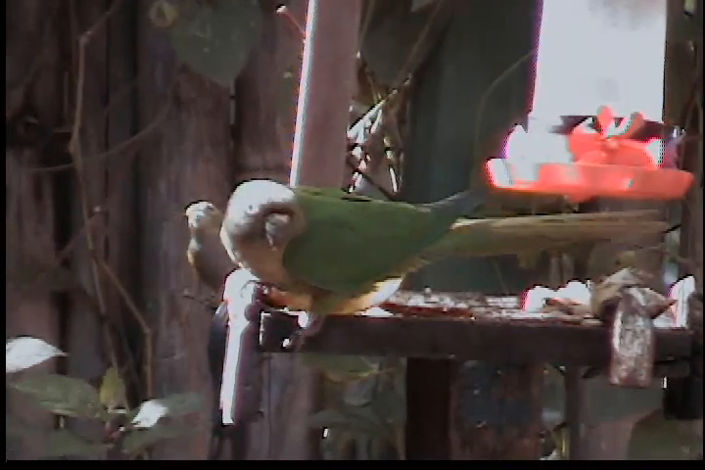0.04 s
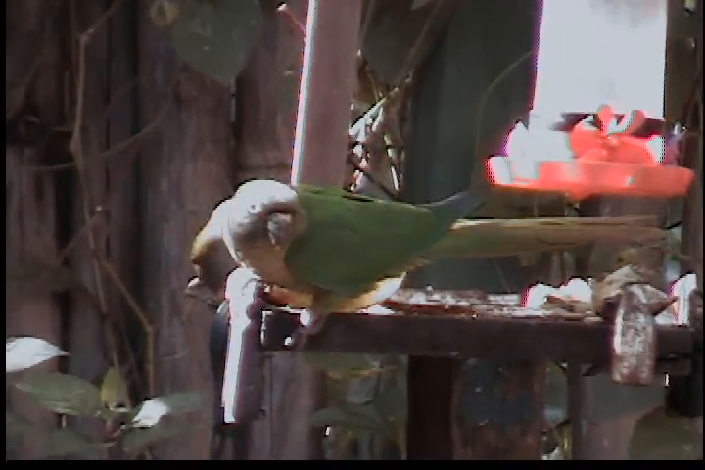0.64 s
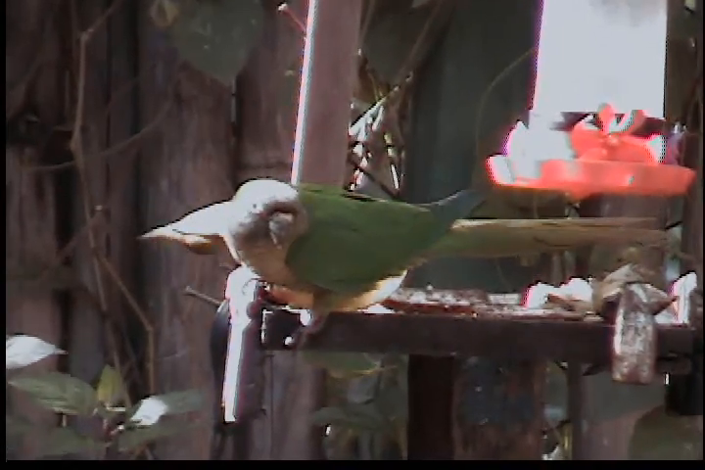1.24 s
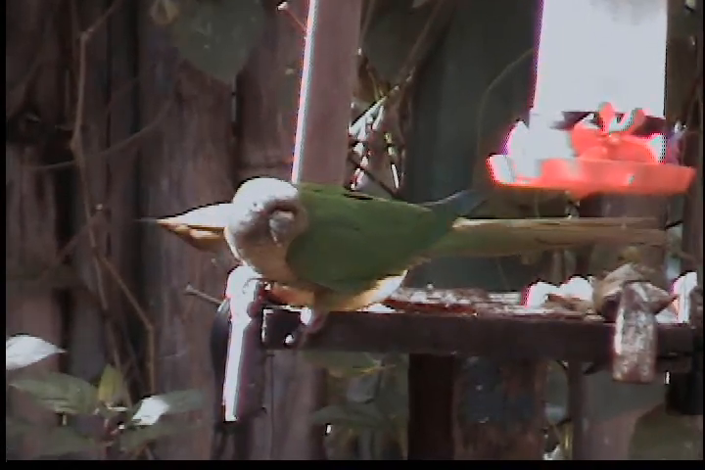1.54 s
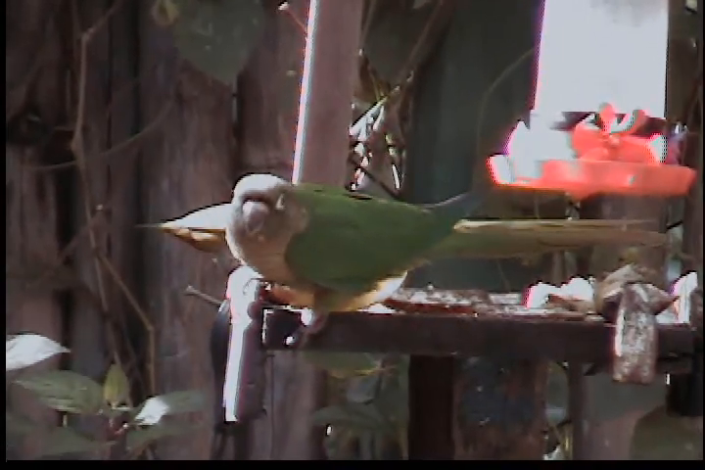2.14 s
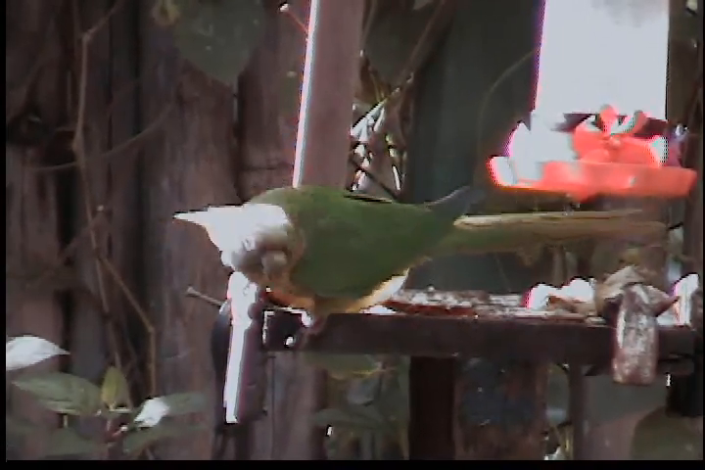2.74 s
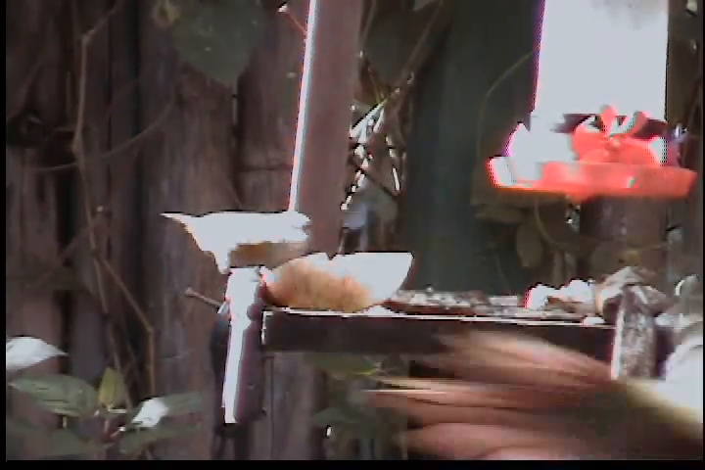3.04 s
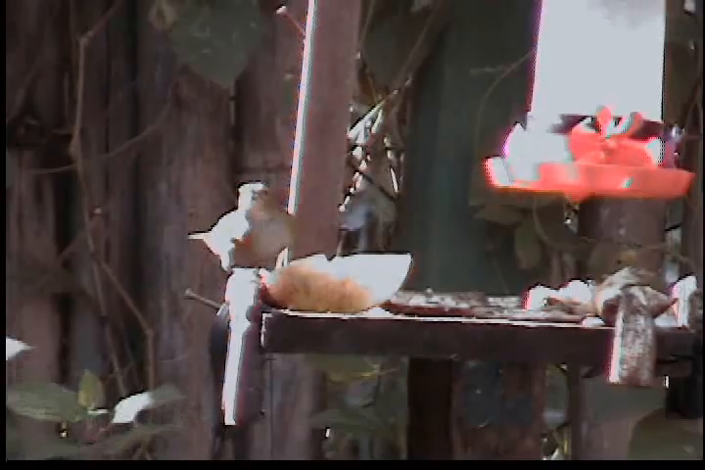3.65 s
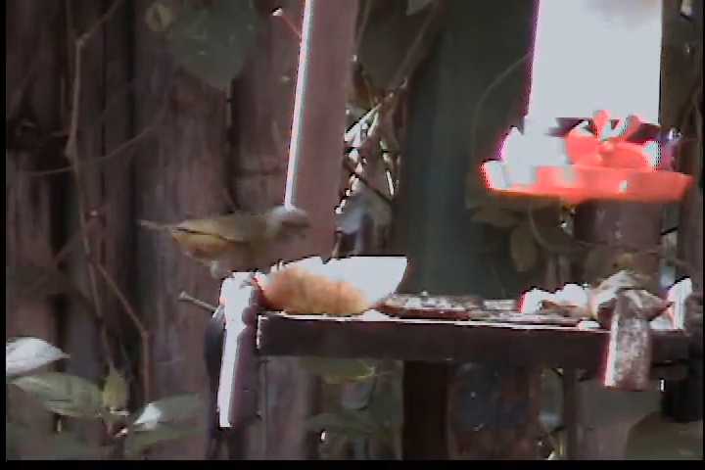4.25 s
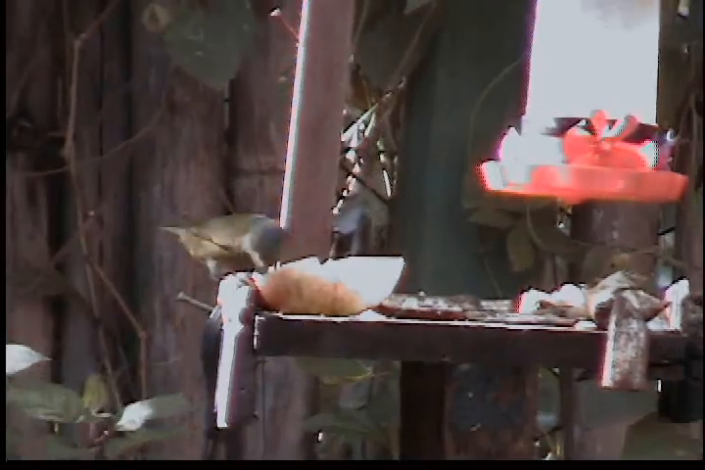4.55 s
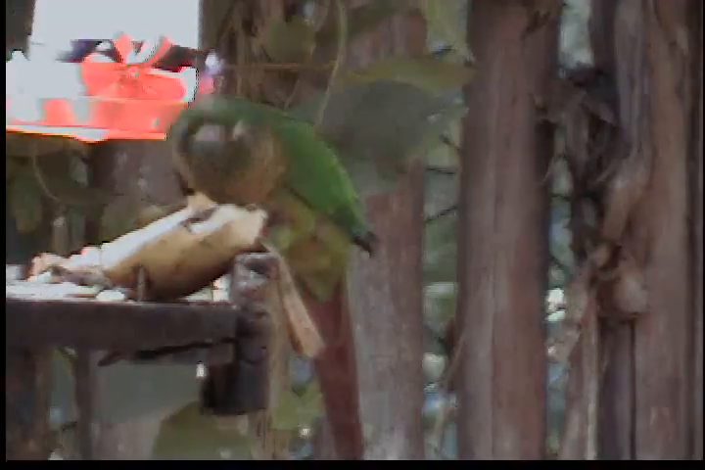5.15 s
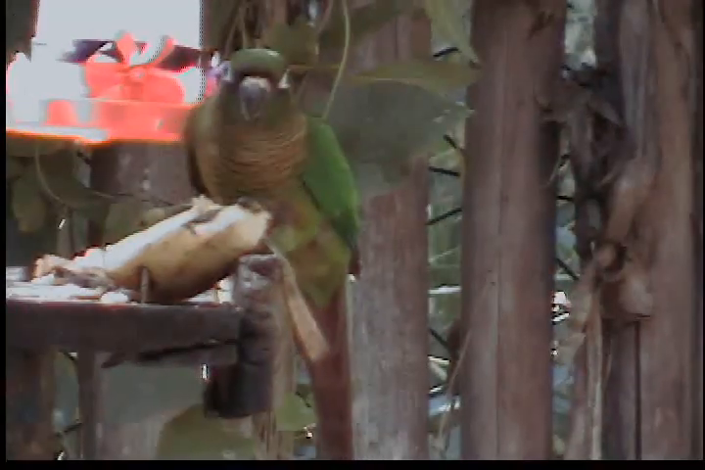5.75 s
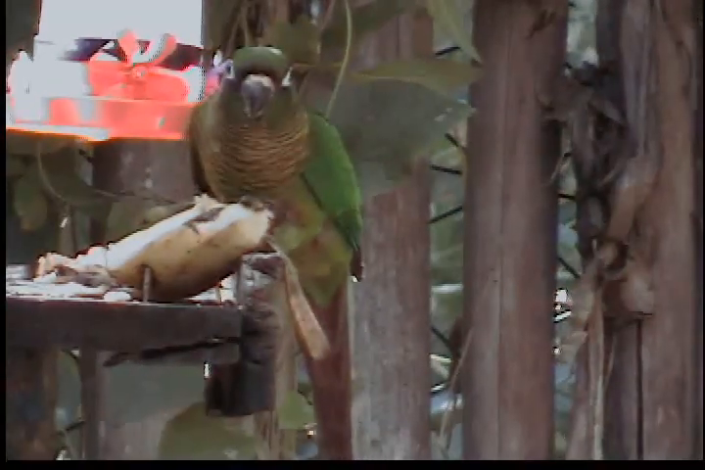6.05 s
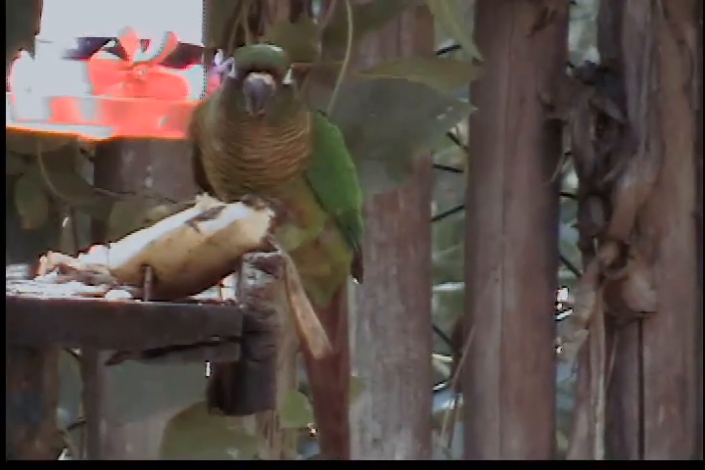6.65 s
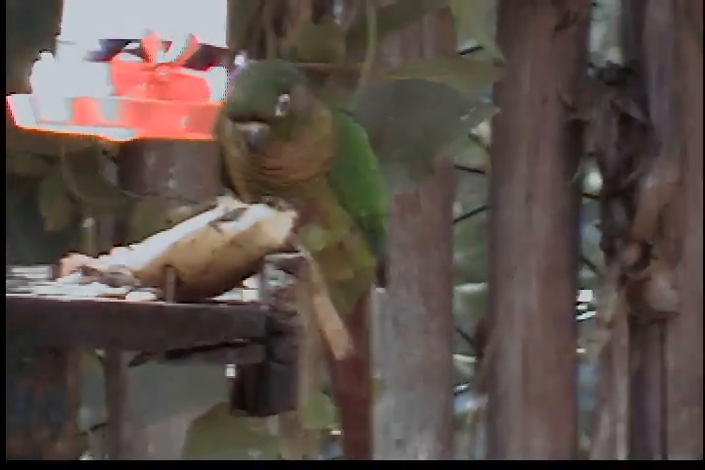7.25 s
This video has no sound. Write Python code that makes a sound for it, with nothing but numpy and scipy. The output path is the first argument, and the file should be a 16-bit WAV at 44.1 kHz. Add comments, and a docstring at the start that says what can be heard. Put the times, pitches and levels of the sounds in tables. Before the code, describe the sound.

Parakeets screech at a backyard feeder, about eight harsh calls that swell and slide down in pitch, some overlapping, with two short hoarse barks early on. The calls echo lightly off a fence and walls. Fainter whistled chirps answer from the trees, and near the end one close chip sounds sharp as a click. The microphone also picks up distant rumble, a low hum, a faint high whine and a few soft bumps.

```python
"""Parakeets screech and bark around a backyard feeder: a buzzing syrinx and puffs of rasp, shaped by
throat and beak. Each screech swells, slides down in pitch and echoes off fences and walls.
Short whistled chirps answer from the trees, and one close chip is sharp like a click.
Underneath sits a bed of distant rumble, low hum, a thin steady whine and a few soft bumps."""
import sys
import numpy as np
from scipy import signal
from scipy.fft import rfft, irfft
from scipy.io import wavfile
from scipy.ndimage import uniform_filter1d

SR = 44100
rng = np.random.default_rng(int(sys.argv[2]) if len(sys.argv) > 2 else 0)


def bounce(signal):
    """Save signal as a 16-bit WAV file at the path given by the first command-line argument."""
    frames = np.transpose(np.atleast_2d(signal))
    limited = np.clip(frames, -1, 1)
    pcm = np.round(limited * 32767).astype(np.int16)
    wavfile.write(sys.argv[1], SR, pcm)


N = 321489
TIME = np.arange(N) / SR

# EQ curve of the distant rumble and hiss: f/Hz, relative level/dB
RUMBLE_EQ = [(18,-20),(30,-3.5),(42,-13.5),(60,-11),(110,-9.5),(200,-15.5),(400,-19),(1000,-22),(2400,-28),(3000,-31.5),(4600,-38.5),(8500,-41)]
# level ride of the hum: t/s, level/dB
HUM_RIDE = [(0,-49),(2.8,-54.5),(3.3,-64),(5.3,-63.5),(5.6,-56),(7.29,-52.5)]
# tones of the whine: f/Hz, level/dB
WHINE_TONES = [(6050,-72),(7866,-76.5),(8000,-66.5)]
# screeches: start t/s, rise/s, fall/s, start f/Hz, crest f/Hz, rest f/Hz, glide/s, relative level/dB,
# opening against that level/dB, time to the burst/s, hold (exponent of the fade curve),
# treble/dB, dulling/(dB/s), rasp/dB, first beak f/Hz, last beak f/Hz
SCREECH_CUES = [ (.43, 0.083, 0.35, 692, 713.3, 561, 0.059,  -40, -11, 0.094, 10,  -0.5, 15, -9, 2770, 2460),
                (.77, 0.094, 0.2, 491, 494.5, 424, 0.13,  -32.5, -5, 0.057, 0.64,  -4, 141, -12.5, 2430, 2150),
                (1.355, 0.13, 0.48, 490.3, 748.3, 499, 0.081,  -37.5, -7.5, 0.17, 2.3,  4.5, 54, -7, 3700, 3150),
                (2.16, .13, 0.38, 480.5, 680.2, 470.6, .075,  -38.5, -6.5, .09, 2.1,  -3, 24, -7, 1280, 950),
                (2.93, .09, 0.16, 577.5, 554.7, 448.6, .11,  -39.5, -6, .10, 2.1,  0, 7, -3.5, 2360, 2100),
                (3.655, .149, 0.46, 485.7, 809.3, 492.2, .064,  -39.5, -5, 0.18, 3.3,  -3, 10, -7, 1510, 2150),
                (4.66, .14, 0.33, 551.5, 681.3, 456, 0.084,  -40, -4, 0.15, 2,  -2, 12, -7.5, 1950, 2060),
                (6.03, 0.14, .36, 659, 725.6, 459.5, 0.1,  -40.5, -6, 0.13, 2.8,  -4.5, 1.5, -6, 2850, 2030)]
# EQ curve of the rasp: f/Hz, relative level/dB
RASP_EQ = [(800,-4.5),(1700,5.5),(4300,2),(8000,-10.5)]
# resonances of throat and beak: f/Hz, relative level/dB
THROAT_EQ = [(400,-27.5),(600,-15),(750,0),(980,2),(1280,-1),(1750,1),(2100,-2.5),(2420,-3.5),(2800,-10),(3400,-8),(4300,-11.5),(5100,-13),(6500,-11),(8500,-9)]
# slaps off fence and wall: delay t/s, relative level/dB
WALL_SLAPS = [(.011,-8),(.036,-11)]
# hoarse barks: start t/s, length/s, pitch f/Hz, relative level/dB, treble/dB, beak f/Hz
BARK_CUES = [(1.091, 0.1, 373.2, -37, -8, 2200), (2.868, 0.073, 565, -40, -9, 1750)]
# chirps, one slur each: start t/s, length/s, first f/Hz, last f/Hz, dry level/dB, warble (share of pitch)
CHIRP_CUES = [(1.974,0.067,4140,4700,-56,0.013),(2.038,0.052,4550,3860,-50.5,0.034),(2.506,0.061,4620,3920,-48,0.02),
              (3.211,0.093,3630,4330,-54,0.062),(3.306,.085,4610,3025,-50,.035),(3.634,0.13,3970,3190,-47,0.031),
              (4.07,.12,4220,3683,-46.5,0.015),(4.183,0.078,3690,3126,-47.5,0.013),(4.469,0.12,3545,3390,-51,.12),
              (4.943,.06,4020,3450,-58,0.016),(5.029,.05,3750,3180,-54,0.017),(5.125,0.095,4200,2900,-53.5,0.095),(5.281,.085,3383,4195,-51,0.041),
              (5.773,0.1,4360,3214,-58,0.097),(5.984,0.083,3800,4380,-56.5,0.056),(6.591,0.082,4390,3080,-52,0.079),
              (6.809,.076,3740,3836,-46.5,0.094),(7.147,0.15,3700,3960,-55,0.12)]
# partials of a chirp: multiple of the pitch, relative level/dB
CHIRP_TIMBRE = [(.5,-18.5),(1,-2),(1.5,-17)]
# soft bumps: centre t/s, length/s, level/dB
BUMP_CUES = [(4.637,0.091,-48),(5.858,0.074,-44.5),(7.21,0.047,-40)]
# the close chip: start t/s, length/s, first f/Hz, middle f/Hz, last f/Hz, relative level/dB
CHIP_CUE = (6.772,.052,3330,3260,3480,-35)
# partials of the chip: multiple of the pitch, relative level/dB
CHIP_TIMBRE = [(1,-0.5),(1.6,-17),(2,-22),(2.2,-22.5),(.42,-18)]


def from_db(db):
    """Decibels to gain."""
    return 10 ** (np.asarray(db) / 20)


def rms_one(x):
    """Scale to unit power."""
    return x / np.sqrt(np.mean(x ** 2) + 1e-20)


def equalise(x, curve):
    """Shape a sound with an EQ curve on a log-frequency axis; rms 1."""
    hz = np.arange(len(x) // 2 + 1) * SR / len(x)
    curve_hz, curve_db = np.transpose(curve)
    gain_db = np.interp(np.log(np.maximum(hz, 1)), np.log(curve_hz), curve_db)
    return rms_one(irfft(rfft(x) * from_db(gain_db), len(x)))


def drift(size, rate_hz):
    """Random modulation up to about the given rate; rms 1."""
    lowpass = signal.butter(2, rate_hz, fs=SR, output="sos")
    return rms_one(signal.sosfilt(lowpass, rng.standard_normal(size + SR // 4))[-size:])


def span(start, length):
    """The times that a sound covers."""
    return TIME[(TIME >= start) & (TIME < start + length)]


def fade(t, edge_s):
    """Soft attack and release."""
    return np.sin(np.pi / 2 * np.clip(np.minimum(t - t[0], t[-1] - t) / edge_s, 0, 1))


def mix(sounds):
    """Lay (times, sound) pairs on one track."""
    track = np.zeros(N)
    for t, sound in sounds:
        track[np.searchsorted(TIME, t[0]):][:len(t)] += sound
    return track


def rumble(level_db=-48):
    """Distant noise, heavy in the lows with a faint hiss on top."""
    return from_db(level_db) * equalise(rng.standard_normal(N), RUMBLE_EQ)


def hum(hz=71.1):
    """A low, slightly wavering tone that ducks midway and comes back."""
    level_db = np.interp(TIME, *np.transpose(HUM_RIDE))
    phase = 2 * np.pi * hz * TIME + .5 * drift(N, 3.9)
    return np.sqrt(2) * from_db(level_db) * np.sin(phase)


def whine():
    """Three thin, steady high tones."""
    return sum(np.sqrt(2) * from_db(db) * np.sin(2 * np.pi * hz * TIME) for hz, db in WHINE_TONES)


def voice(t, pitch, level_db, treble_db, rasp_db, beak_hz, beak_db=7, beak_width_hz=220, split_hz=2800):
    """The syrinx buzzes unsteadily and rasp puffs once a cycle; the beak colours the buzz, the throat colours
    both."""
    rasp = from_db(rasp_db)
    jitter = .004 * drift(len(t), 40) + .02 * rasp * drift(len(t), 250)
    phase = 2 * np.pi * np.cumsum(pitch * (1 + jitter)) / SR
    top_hz = 4100 / rasp ** .16   # the hoarser the voice, the lower its clean overtones end
    buzz = 0
    for k in range(2, 16):   # overtones only, no fundamental
        resonance_db = beak_db / (1 + ((k * pitch - beak_hz) / beak_width_hz) ** 2)
        flicker_db = 5.5 * drift(len(t), 11.2)
        rolloff = 1 / (1 + (k * pitch / top_hz) ** 8)
        buzz += np.sin(k * phase) * from_db(resonance_db + flicker_db) * rolloff
    puffs = equalise(rng.standard_normal(len(t)) * (1 + np.cos(phase)), RASP_EQ)
    call = equalise(rms_one(buzz) + rasp * puffs, THROAT_EQ)
    # set the brightness: level the low and high bands, then mix them by the given treble
    low = signal.sosfiltfilt(signal.butter(6, split_hz, fs=SR, output="sos"), call)
    high = call - low
    low, high = [band / np.sqrt(uniform_filter1d(band ** 2, size=1800) + 1e-9) for band in (low, high)]
    return t, from_db(level_db - 2) * (low + from_db(treble_db) * high) * fade(t, .025)


def screech(start, rise, fall, start_hz, crest_hz, rest_hz, glide, level_db, opening_db, burst, hold,
            treble_db, dulling, rasp_db, first_beak_hz, last_beak_hz):
    """A held-back opening, a burst near the crest, then a slide that sags, dulls and fades."""
    burst_s, beak_move_s, entry_db, fade_db = .021, .19, -2, 10
    sag_hz_per_s = 300   # the pitch sinks as the breath runs out
    t = span(start, rise + fall)
    since_crest = t - start - rise
    to_climb, after = np.maximum(-since_crest / rise, 0), np.maximum(since_crest, 0)
    slide_hz = rest_hz + (crest_hz - rest_hz) * np.exp(-after / glide) - sag_hz_per_s * after
    held_back = .5 - .5 * np.tanh((t - start - burst) / burst_s)
    envelope_db = entry_db * to_climb + opening_db * held_back - fade_db * (after / fall) ** hold
    # the beak's resonance makes one overtone pierce; it sweeps from the crest on
    sweep = np.sin(np.pi / 2 * np.minimum(after / beak_move_s, 1)) ** 2
    return voice(t, pitch=slide_hz + (start_hz - crest_hz) * to_climb,
                 level_db=level_db + envelope_db,
                 treble_db=treble_db + .5 * held_back - dulling * after,
                 rasp_db=rasp_db - .5 * held_back,
                 beak_hz=first_beak_hz + (last_beak_hz - first_beak_hz) * sweep,
                 beak_db=7 + 3 * held_back)


def yard(x, t60_s, wet_db, slap_db, build_s, damping_hz):
    """Fence and wall add two slaps and a scattered tail that blooms and decays, all darkened."""
    t = TIME[:SR]
    tail = rng.standard_normal(SR) * from_db(-60 * t / t60_s) * (1 - np.exp(-t / build_s))
    response = from_db(wet_db) * tail / np.linalg.norm(tail)
    for delay, db in WALL_SLAPS:
        response[int(delay * SR)] += from_db(db + slap_db)
    response = signal.sosfilt(signal.butter(2, damping_hz, fs=SR, output="sos"), response)
    return x + signal.fftconvolve(x, response)[:N]


def bark(start, length, pitch_hz, level_db, treble_db, beak_hz):
    """The parakeet's voice on one pitch, mostly rasp, loudest in the middle."""
    t = span(start, length)
    swell_db = -7.5 * np.linspace(-1, 1, len(t)) ** 2
    return voice(t, pitch_hz, level_db + swell_db, treble_db, rasp_db=6, beak_hz=beak_hz)


def whistle(start, length, first_hz, middle_hz, last_hz, level_db, warble, partials, edge_s):
    """A whistled arc through three pitches, with a fast random warble."""
    t = span(start, length)
    parabola = np.polyfit([0, .5, 1], [first_hz, middle_hz, last_hz], 2)
    arc_hz = np.polyval(parabola, (t - start) / length)
    phase = 2 * np.pi * np.cumsum(arc_hz * (1 + warble * drift(len(t), 296))) / SR
    tone = sum(from_db(db) * np.sin(k * phase) for k, db in partials)
    return t, from_db(level_db) * rms_one(tone) * fade(t, edge_s)


def chirp(start, length, first_hz, last_hz, level_db, warble):
    """A whistled slur that starts fast and eases into its last pitch."""
    middle_hz = first_hz + .58 * (last_hz - first_hz)
    return whistle(start, length, first_hz, middle_hz, last_hz, level_db, warble, CHIRP_TIMBRE, .0062)


def bumps():
    """Soft thuds: brief swells of low noise."""
    swells = sum(from_db(db) * np.exp(-(2 * (TIME - centre) / length) ** 2)
                 for centre, length, db in BUMP_CUES)
    return swells * drift(N, rate_hz=110)


def chip():
    """One very short whistle with a click-sharp attack."""
    return whistle(*CHIP_CUE, warble=.005, partials=CHIP_TIMBRE, edge_s=.0027)


def scene():
    """Mono mix over the bed: calls across the yard, chirps farther off, the chip up close."""
    calls = mix(screech(*cue) for cue in SCREECH_CUES) + mix(bark(*cue) for cue in BARK_CUES)
    chirps = mix(chirp(*cue) for cue in CHIRP_CUES)
    close_chip = from_db(-3.5) * mix([chip()])
    birds = (yard(calls, t60_s=.72, wet_db=-2.5, slap_db=-5, build_s=.01, damping_hz=6150)
             + yard(chirps, t60_s=.79, wet_db=4, slap_db=0, build_s=.028, damping_hz=6950)
             + yard(close_chip, t60_s=.47, wet_db=-3.5, slap_db=-20, build_s=.11, damping_hz=6000))
    return (birds + rumble() + hum() + whine() + bumps())[None]


def record(dry, cutoff_hz=8650):
    """A steep high cut on the whole mix."""
    return signal.sosfilt(signal.ellip(12, .1, 80, cutoff_hz, fs=SR, output="sos"), dry)


dry = scene()
out = record(dry)
bounce(out)
```